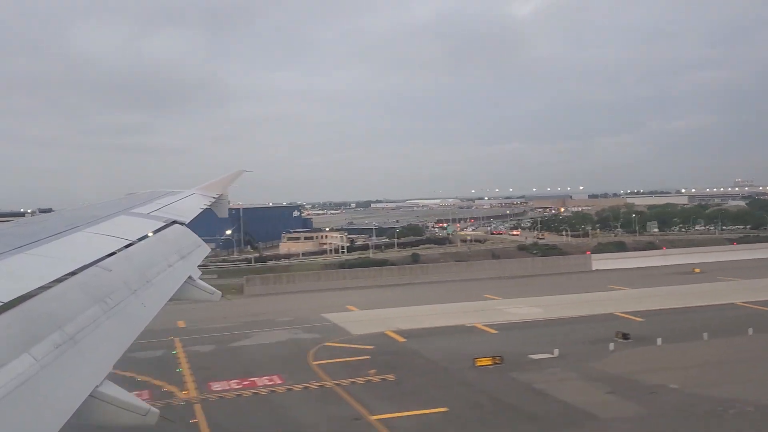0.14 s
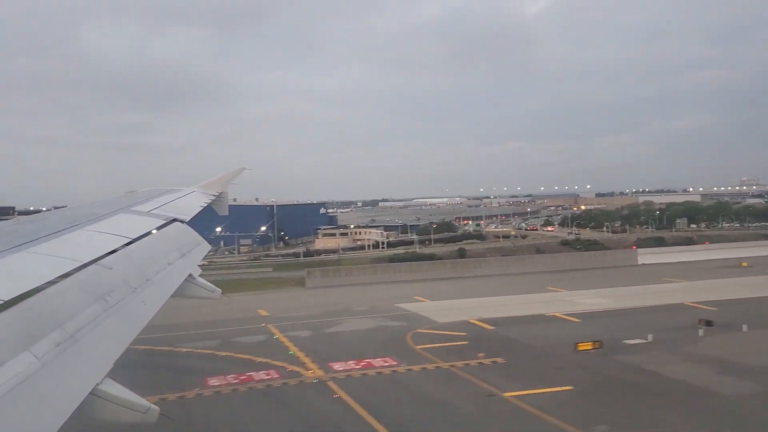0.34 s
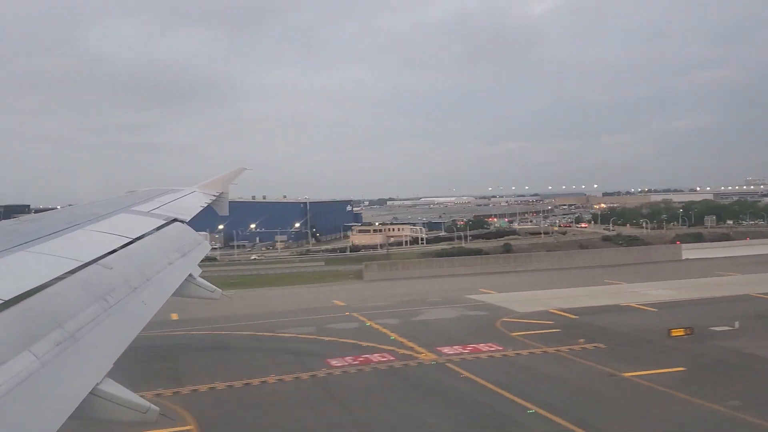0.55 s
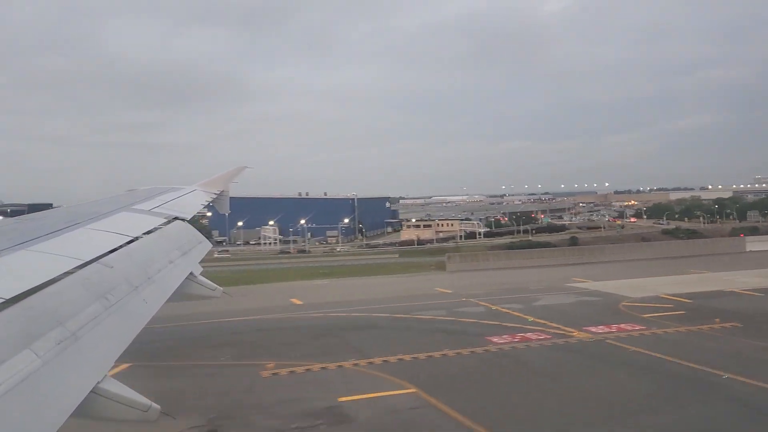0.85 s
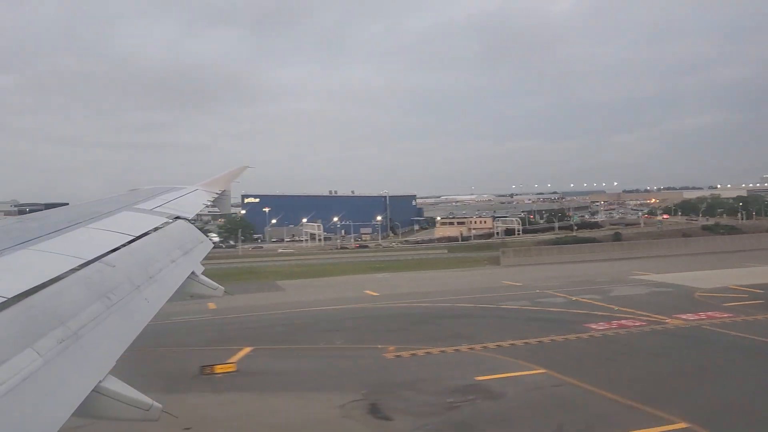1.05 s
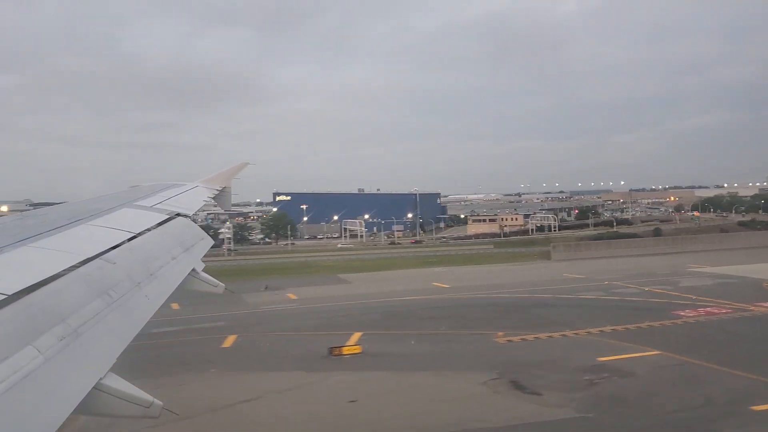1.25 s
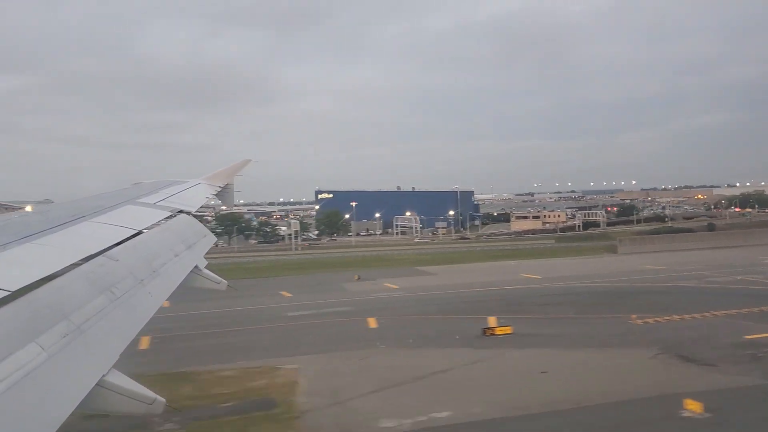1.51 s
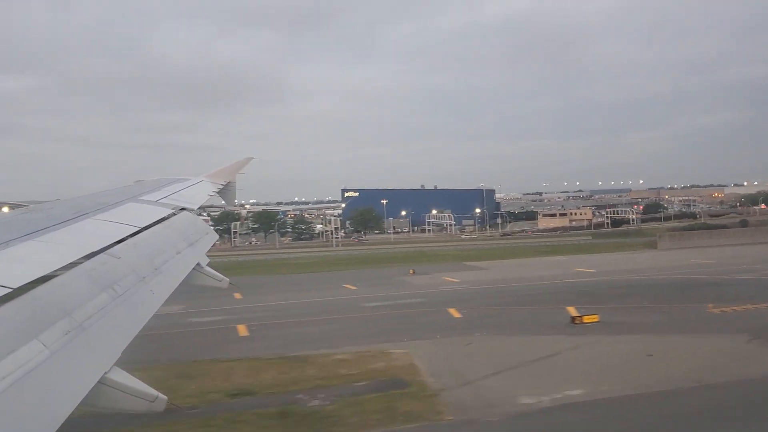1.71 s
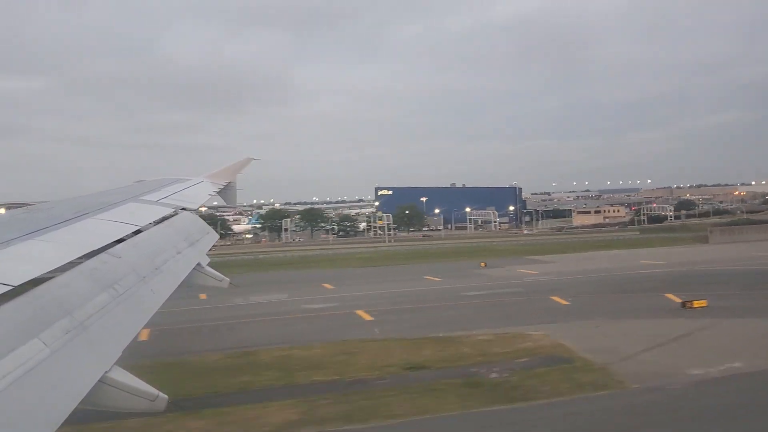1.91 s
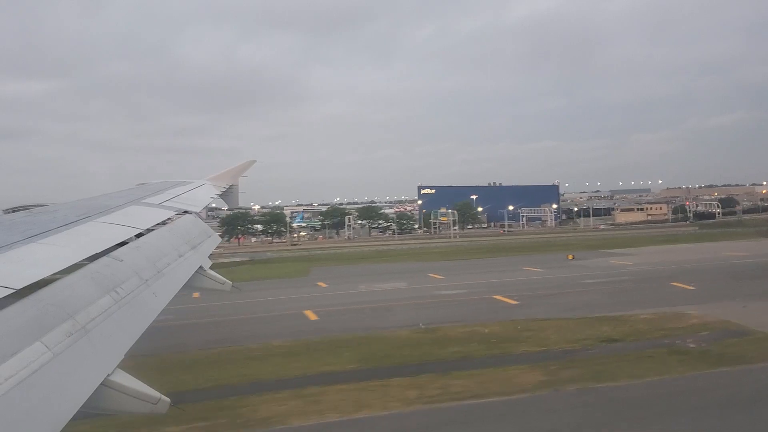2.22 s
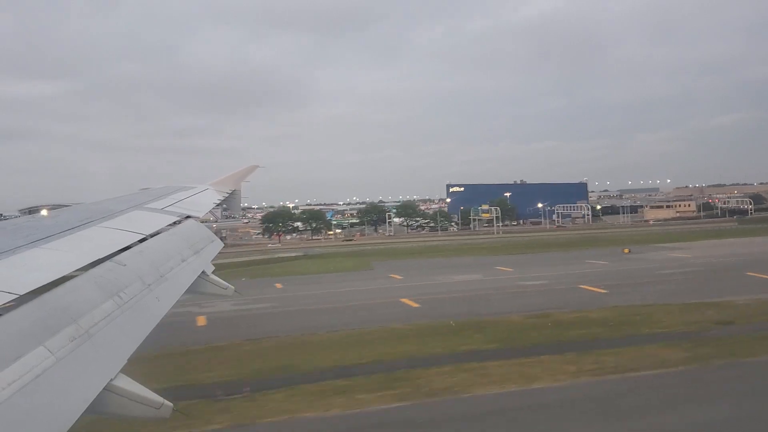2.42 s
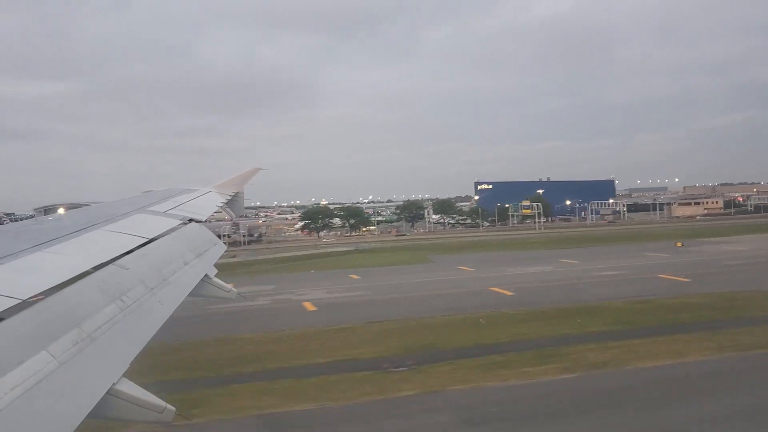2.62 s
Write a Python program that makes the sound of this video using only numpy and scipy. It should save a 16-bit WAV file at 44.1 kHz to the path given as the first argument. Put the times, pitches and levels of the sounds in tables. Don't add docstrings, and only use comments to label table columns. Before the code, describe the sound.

A deep, bassy rumble of an airliner rolling on a runway fills the cabin throughout, surging irregularly with bumps, notably around 0.4, 1.0, 1.5 and 2.1 seconds and again at the end. Muffled engine roar sits beneath, with very faint vent air and wavering pump whine. A light panel knock at 0.35, a sharp plastic latch snap with brief rattle at 0.9, then barely audible ticks.

```python
import sys
import numpy as np
from scipy import signal
from scipy.fft import rfft, irfft, next_fast_len
from scipy.io import wavfile
from scipy.ndimage import uniform_filter1d, map_coordinates

SR = 44100
rng = np.random.default_rng(int(sys.argv[2]) if len(sys.argv) > 2 else 0)


def field_ratio(decibels):
    return 10 ** (np.asarray(decibels, dtype=float) / 20)


def transcribe(signal):
    frames = np.atleast_2d(signal).T
    limited = np.clip(frames, -1, 1)
    pcm = np.round(limited * 32767).astype(np.int16)
    wavfile.write(sys.argv[1], SR, pcm)


N = 121716


def unit(x):
    return x / np.sqrt(np.mean(x ** 2) + 1e-20)


def along(points, hz):
    f, v = np.transpose(points)
    return np.interp(np.log(hz + 1), np.log(f + 1), v)


def curves(rows):
    s, *cols = np.transpose(rows)
    return [np.interp(np.arange(N) / SR, s, c) for c in cols]


def wobble(knots_per_s):
    return map_coordinates(rng.standard_normal(400), [np.arange(N) * knots_per_s / SR])


def filtered(x, response):
    m = next_fast_len(len(x) + 8192)
    return irfft(rfft(x, m) * response(np.fft.rfftfreq(m, 1 / SR)), m)[:len(x)]


def rush(response, patchy_db):
    z = signal.stft(rng.standard_normal(N), nperseg=1024)[2]
    field = rng.standard_normal(z.shape)
    field = uniform_filter1d(uniform_filter1d(field, 6, 0), 8, 1)
    patchy = signal.istft(z * field_ratio(patchy_db * unit(field)), nperseg=1024)[1][:N]
    return unit(filtered(patchy, response))


def ring(f, hz, width_hz):
    return 1j * f * width_hz / (hz * hz - f * f + 1j * f * width_hz)


def resonances(f, modes):
    return sum((-1) ** k * field_ratio(db) * ring(f, hz, width) for k, (hz, width, db) in enumerate(modes))


# time in seconds, level in dB.
ROLL = [(0.0, -9.5), (0.35, -23.5), (0.39, -12), (0.81, -20), (0.96, -10.5), (0.98, -17.5), (1.41, -20),
        (1.49, -10.5), (1.54, -28.5), (1.57, -16), (2.03, -19), (2.09, -6.5), (2.23, -21), (2.76, -11.5)]
# frequency in Hz, width in Hz, level in dB.
BOOM = [(51.8, 18, -3), (80, 20, -3), (90.7, 10.7, 1)]
# frequency in Hz, density in dB per Hz.
ROAR = [(62, -40.5), (105, -5), (150, -6), (220, -8), (310, -12), (365, -19), (430, -22), (600, -32),
        (1300, -55.5), (1700, -89), (2900, -120)]
BOOM_LOW_HZ, BOOM_TOP_HZ = 39, 108
BOOM_FOLLOWS, ROAR_FOLLOWS = 0.83, 0.044
ROAR_DB = -22.5


def airframe():
    shake_db, = curves(ROLL)
    mean_db = shake_db.mean()
    swing_db = shake_db - mean_db

    def fuselage(f):
        top_cut = np.sqrt(1 + (f / BOOM_TOP_HZ) ** 8)
        low_cut = np.sqrt(1 + (BOOM_LOW_HZ / (f + 1)) ** 10)
        return resonances(f, BOOM) / top_cut / low_cut

    boom = field_ratio(mean_db - 0.07 + BOOM_FOLLOWS * swing_db) * rush(fuselage, patchy_db=0.92)
    roar_gain = field_ratio(ROAR_DB + ROAR_FOLLOWS * swing_db + 0.21 * wobble(1.0))
    return boom + roar_gain * rush(lambda f: field_ratio(along(ROAR, f)), patchy_db=0.57)


# frequency in Hz, density in dB per Hz.
VENTS = [(590, -31.5), (1000, -7), (1450, -11), (1710, -12), (1970, -10), (2280, -18.5), (2740, -18),
         (4970, -40), (7000, -49.5), (9100, -70), (15400, -120)]
VENTS_DB = -66


def vents():
    gain = field_ratio(VENTS_DB + 0.9 * wobble(2.5))
    return gain * rush(lambda f: field_ratio(along(VENTS, f)), patchy_db=0.9)


# time in seconds, rotation in Hz, load in dB.
PUMP = [(0, 482.3, -5), (.55, 479.5, -2.5), (.7, 476, -1), (1.3, 477, -0.5), (1.5, 468, -9),
        (1.7, 486.3, 3.5), (2.2, 479.8, 3.5), (2.35, 481.2, -10.5), (2.76, 474, -1.5)]
# multiple of the rotation, level in dB rms.
PUMP_ORDERS = [(1, -45.5), (2, -79), (3, -72.5), (4, -87), (5, -91.5)]
PUMP_WANDER_HZ, PUMP_FLUTTER_DB = 1.6, 4


def pump():
    hz, load_db = curves(PUMP)
    phase = 2 * np.pi * np.cumsum(hz + PUMP_WANDER_HZ * wobble(30)) / SR
    out = np.zeros(N)
    for order, db in PUMP_ORDERS:
        gain = np.sqrt(2) * field_ratio(db + load_db + PUMP_FLUTTER_DB * wobble(6))
        out += gain * np.sin(round(order) * phase)
    return out


# start in seconds, level in dB, panel in Hz, width in Hz, T60 in seconds.
TICKS = [(0.031, -81, 6500, 3000, 0.44), (.136, -68.5, 3250, 2500, .08), (0.135, -74.5, 8900, 9000, 0.046),
         (.348, -51.5, 1456, 250, 0.078), (0.349, -49, 1860, 300, 0.061), (0.347, -60, 2560, 500, 0.12),
         (.348, -64.5, 3124, 400, 0.14), (.348, -63.5, 3725, 400, 0.1), (.41, -69, 2840, 250, .4),
         (.349, -77.5, 10000, 5000, 0.054), (.459, -70, 3770, 3000, .06), (1.791, -76, 4400, 1200, 0.058),
         (1.792, -79, 10000, 9000, 0.036), (2.198, -84.5, 8000, 5910, 0.047), (2.24, -76, 3230, 1485, 0.12),
         (2.24, -83, 11000, 2500, 0.06), (2.669, -74, 4400, 810, 0.16), (2.667, -73.5, 8550, 7000, 0.066),
         (2.718, -88, 11000, 6000, 0.043)]
TICK_RISE_S = 0.00041


def trim():
    out, t = np.zeros(N + SR), np.arange(SR // 4) / SR
    for s, db, hz, width, t60 in TICKS:
        noise = rng.standard_normal(len(t))
        puff = unit(filtered(noise, lambda f: ring(f, hz, width) ** 3))
        envelope = field_ratio(db - 60 * t / t60) * (1 - np.exp(-t / TICK_RISE_S))
        out[round(s * SR):][:len(t)] += envelope * puff
    return out[:N]


# frequency in Hz, T60 in seconds.
CABIN = [(900, 0.16), (2500, 0.21), (4500, 0.22), (6000, 0.13), (14000, 0.08)]


def cabin(x):
    hz, t, z = signal.stft(rng.standard_normal(SR // 3), SR, nperseg=128)
    decay = field_ratio(-60 * t / along(CABIN, hz)[:, None])
    tail = signal.istft(z * decay, SR, nperseg=128)[1]
    delayed = np.pad(x, (200, 0))
    return signal.fftconvolve(delayed, tail / np.linalg.norm(tail))[:len(x)]


# start in seconds, peak in dB.
SNAP = [
    (0.9002, -12),
]
# delay after start in seconds, level in dB.
CONTACTS = [(.0009, -12), (.0016, -5), (.0022, 0), (.0028, 0), (.0066, -9), (.0130, -11), (.0177, -8)]
# frequency in Hz, width in Hz, level in dB.
LATCH = [(960, 200, 3), (1200, 200, 0), (1630, 170, -1), (2000, 400, -5), (2650, 660, -4),
         (3400, 400, -12.5), (4400, 950, -13), (5830, 710, -20.5), (8150, 5500, -23.5)]
LATCH_LOW_HZ, LATCH_TOP_HZ = 950, 5000
SNAP_RISE_S, CRACK_T60_S, RATTLE_S = 0.002, 0.012, 0.042
RATTLE_DB, SCRAPE_DB, SNAP_WET_DB = -3, -14, -13
CONTACT_SAMPLES = 7


def lid(f):
    low_cut = (ring(f, LATCH_LOW_HZ, 1.2 * LATCH_LOW_HZ) * 1j * f / LATCH_LOW_HZ) ** 2
    return resonances(f, LATCH) * low_cut / (1 + 1j * f / LATCH_TOP_HZ)


def latch():
    out, t = np.zeros(N + SR), np.arange(SR // 2) / SR
    for s, db in SNAP:
        rise = 1 - np.exp(-(t / SNAP_RISE_S) ** 2)
        crack = field_ratio(-60 * t / CRACK_T60_S)
        rattle = field_ratio(RATTLE_DB) * np.exp(-(t / RATTLE_S) ** 4 - t / RATTLE_S)
        force = field_ratio(SCRAPE_DB) * rise * (crack + rattle) * rng.standard_normal(len(t))
        for after_s, contact_db in CONTACTS:
            force[round(after_s * SR):][:CONTACT_SAMPLES] += field_ratio(contact_db) * np.hanning(CONTACT_SAMPLES)
        snap = filtered(force, lid)
        snap = snap / np.abs(snap).max()
        wet = field_ratio(SNAP_WET_DB) * cabin(snap)
        out[round(s * SR) - 70:][:len(t)] += field_ratio(db - 6.5) * (snap + wet)
    return out[:N]


def scene():
    return (airframe() + vents() + pump() + trim() + latch())[None]


def low_pass(x):
    return signal.sosfilt(signal.butter(12, 15710, fs=SR, output="sos"), x)


AGC_S, AGC_SHARE = 0.025, 0.2
HISS_DB = -88.5


def record(dry):
    span = int(AGC_S * SR)
    power = np.abs(uniform_filter1d(uniform_filter1d(dry ** 2, span, axis=1), span, axis=1))
    levelled = dry * ((power + 1e-5) / power.mean()) ** (-AGC_SHARE / 2)
    hiss = field_ratio(HISS_DB) * rng.standard_normal(dry.shape)
    return low_pass(levelled + hiss)


dry = scene()
out = record(dry)
transcribe(out)
```